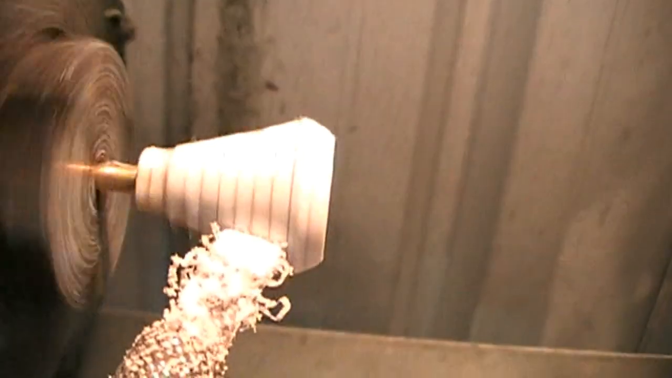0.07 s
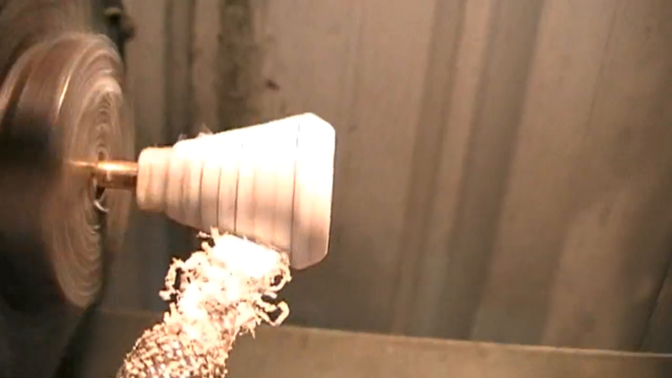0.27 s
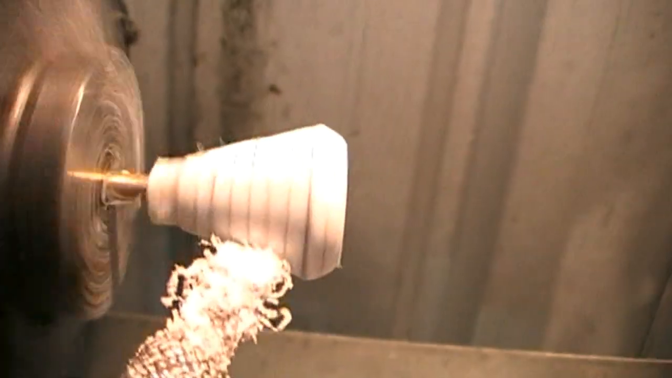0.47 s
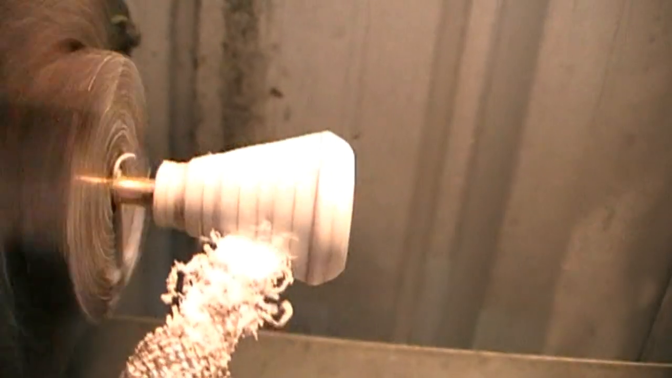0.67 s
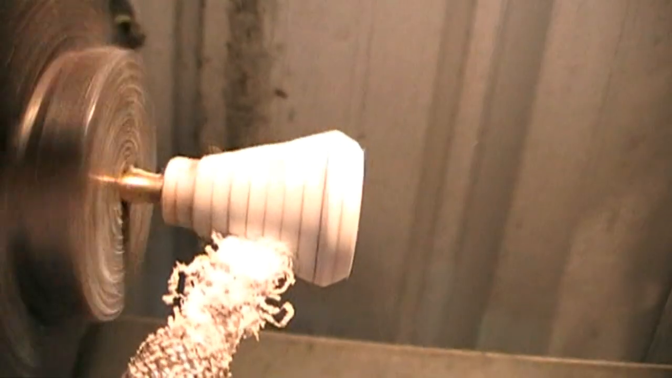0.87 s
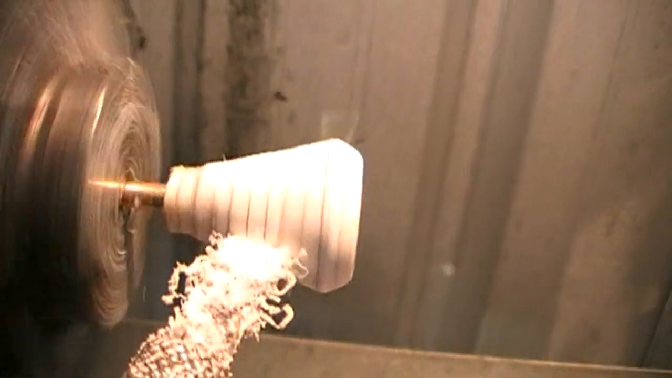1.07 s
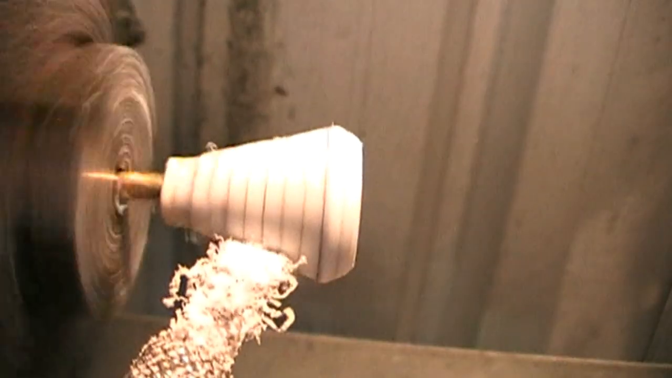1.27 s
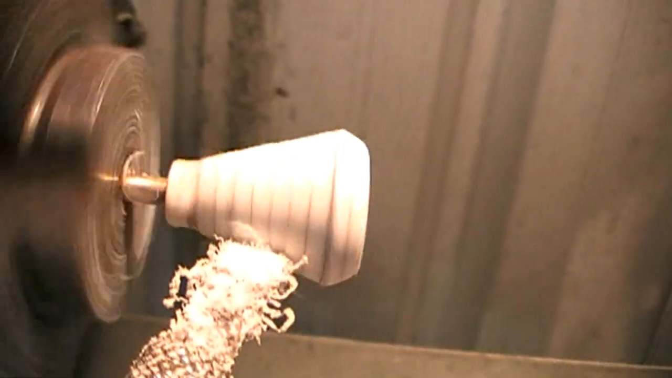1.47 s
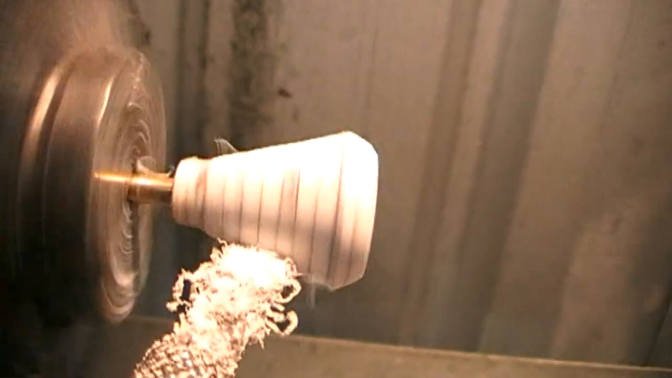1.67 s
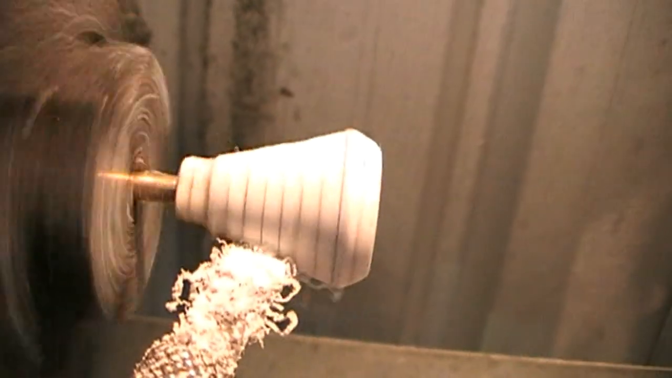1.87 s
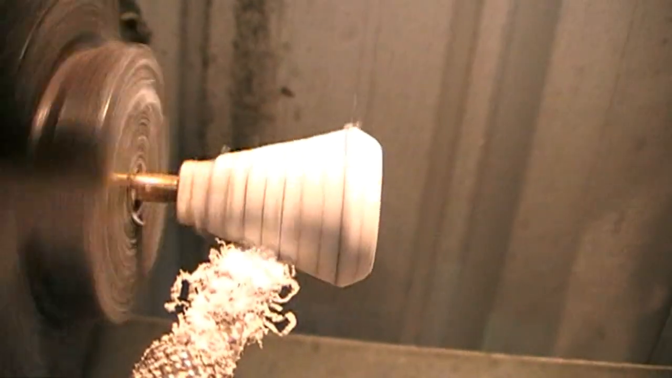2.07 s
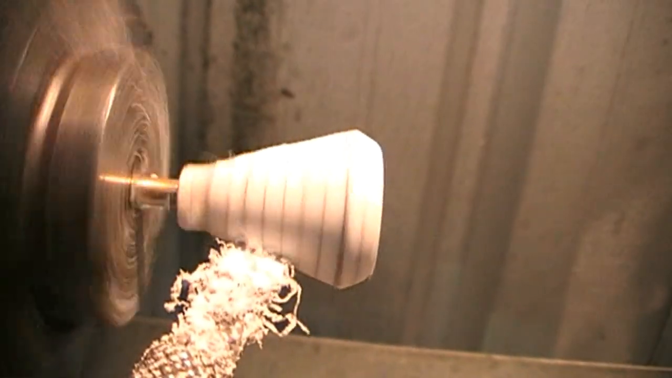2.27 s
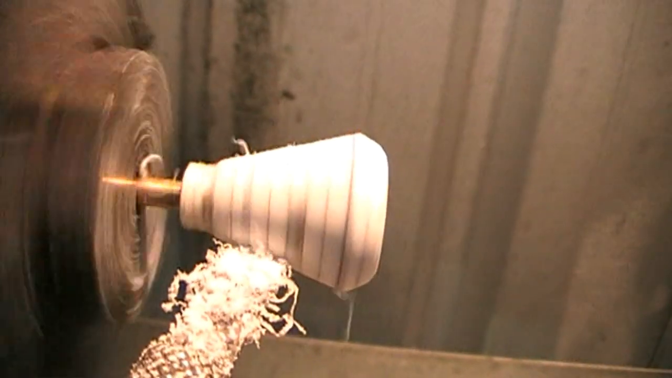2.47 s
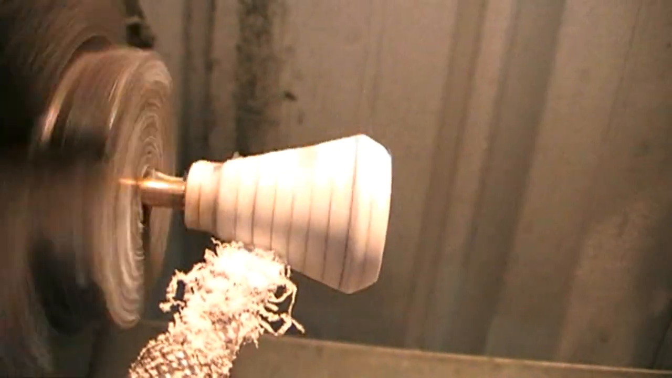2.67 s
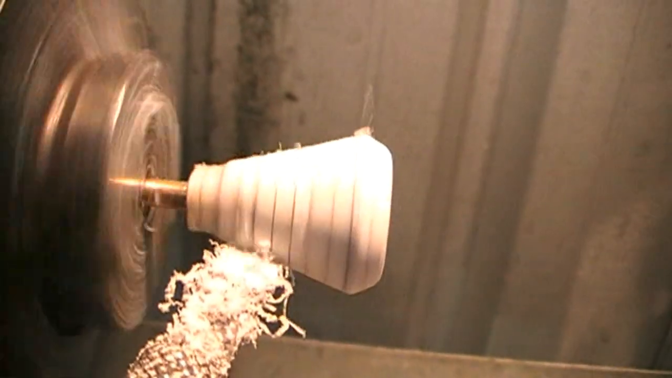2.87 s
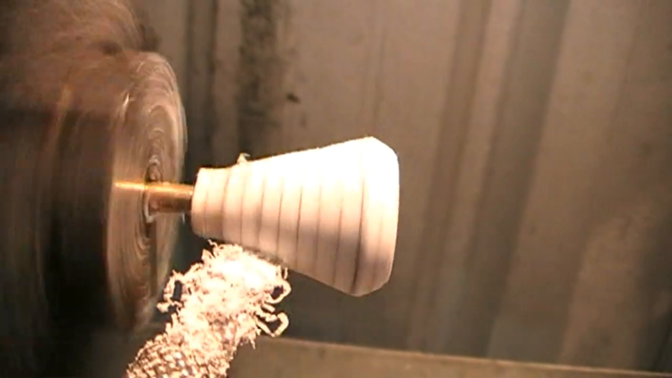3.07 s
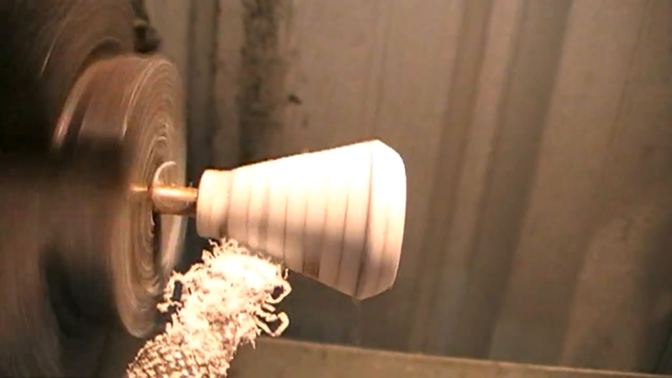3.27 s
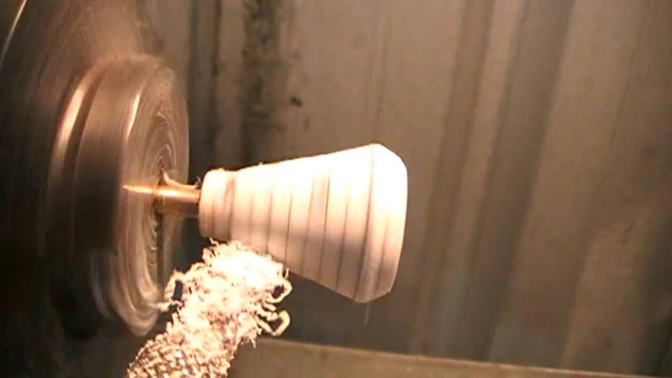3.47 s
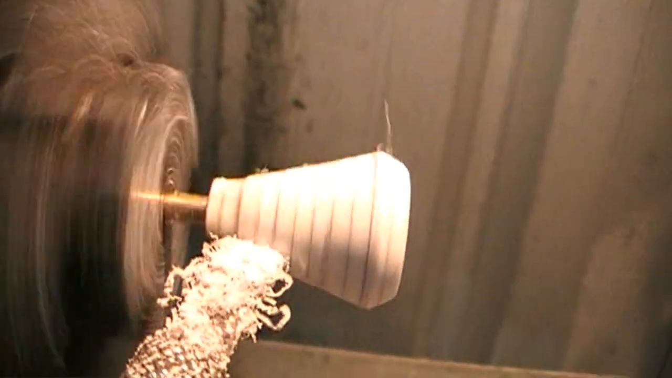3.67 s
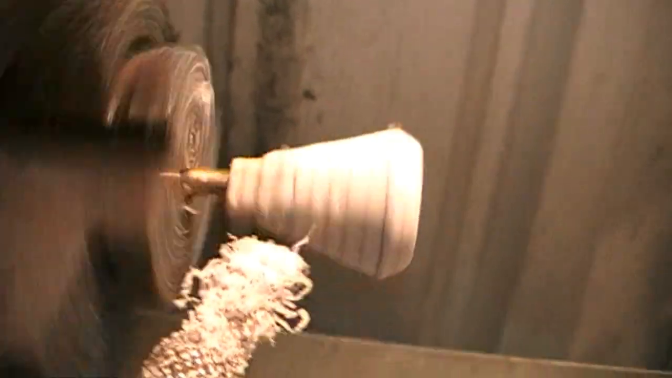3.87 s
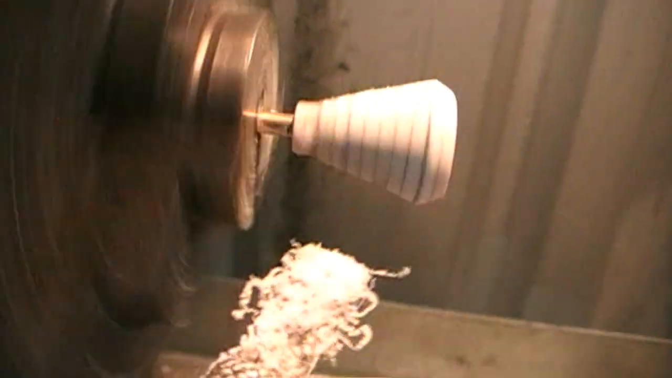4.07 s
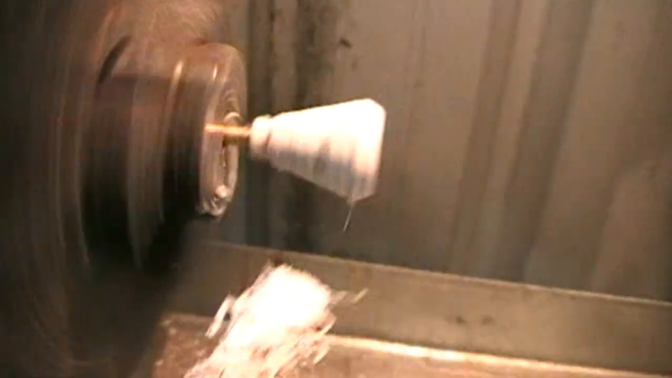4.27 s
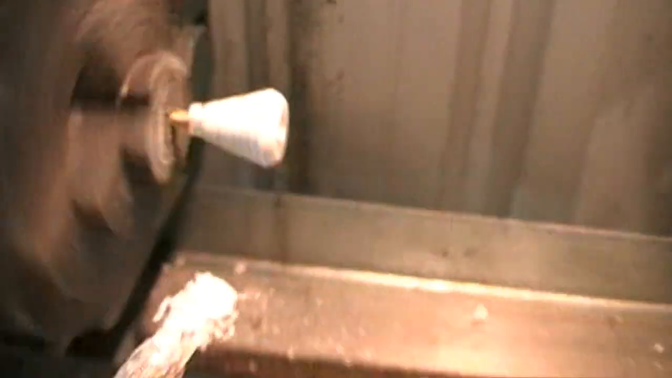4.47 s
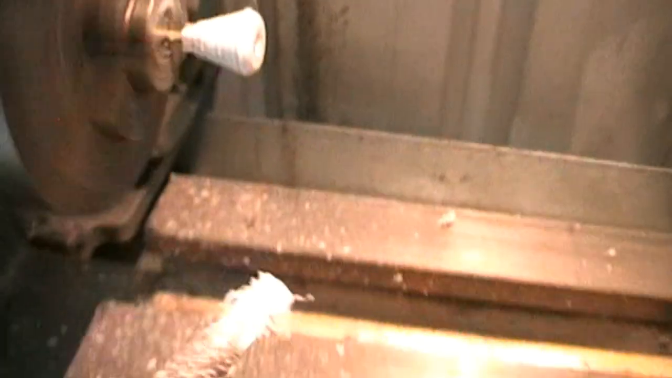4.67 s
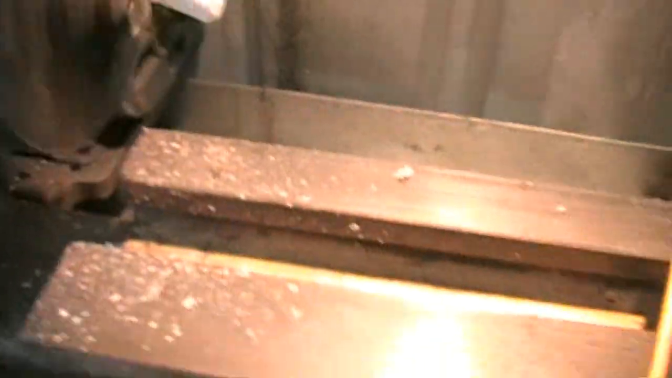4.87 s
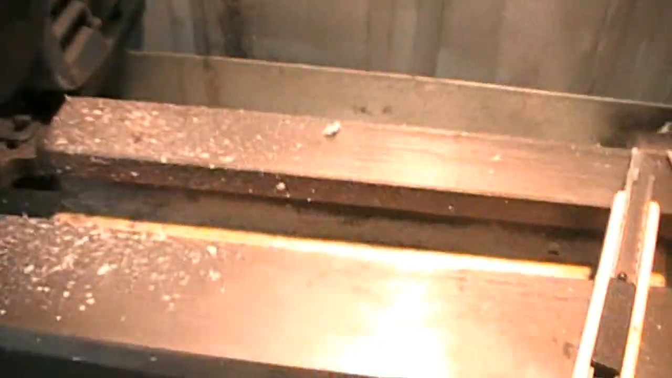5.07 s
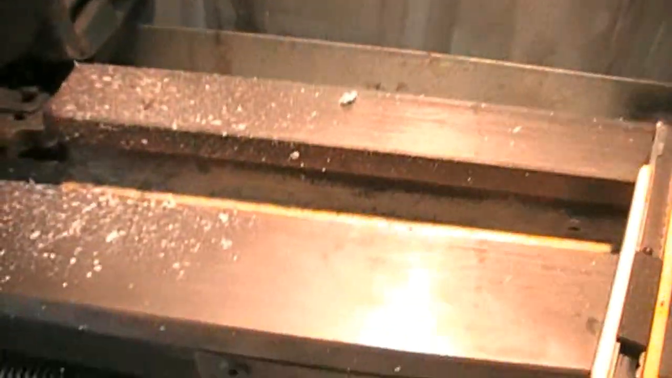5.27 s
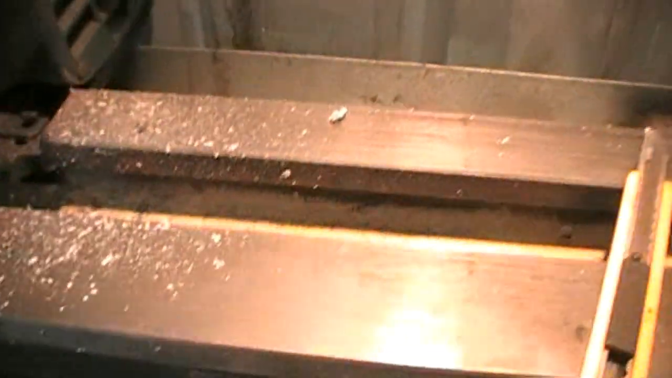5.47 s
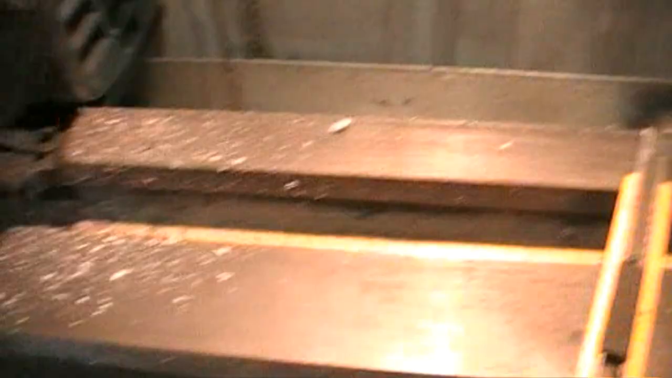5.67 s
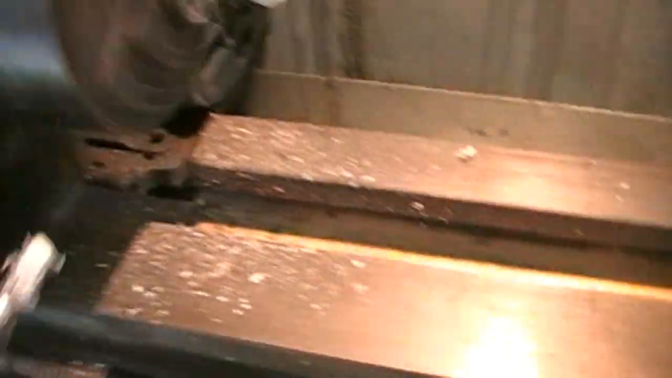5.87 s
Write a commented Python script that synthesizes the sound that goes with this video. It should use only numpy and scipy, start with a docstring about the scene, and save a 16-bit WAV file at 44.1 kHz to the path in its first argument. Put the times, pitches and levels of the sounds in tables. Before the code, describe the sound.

A blade scrapes work spinning on a lathe with a high, chattering squeal, then stops, leaving the throbbing motor and two sharp clicks.

```python
"""In a workshop, a hand-held blade shaves the work spinning on a small lathe.
Stick-slip friction makes the edge chatter and, in two bouts, squeal; tearing shavings set the blade
ringing and the loaded mandrel hums until the edge lets go. The motor throbs on, and slack in the drive
knocks once a spindle turn. Two close clicks sound; the first, brighter one makes an automatic gain
control briefly duck the level."""
import sys
import numpy as np
from scipy import signal
from scipy.fft import rfft, irfft
from scipy.io import wavfile
from scipy.ndimage import uniform_filter1d, minimum_filter1d

SR = 44100
rng = np.random.default_rng(int(sys.argv[2]) if len(sys.argv) > 2 else 0)


def inscribe(sig):
    """Save sig as 16-bit PCM at rate SR to the path in sys.argv[1].

    A 1-D sig is mono; a 2-D sig holds one channel per row.
    Samples are clipped to [-1, 1] before scaling.
    """
    pcm = np.round(np.clip(np.atleast_2d(sig).T, -1, 1) * 32767)
    wavfile.write(sys.argv[1], SR, pcm.astype(np.int16))


N = 260631
T = np.arange(N) / SR
SPINDLE_HZ = 8.82


# course of the cut: (time [s], chatter [dB], blade ring [dB], shavings [dB], chatter frequency [Hz],
# coupling to the uneven work [ratio], stutter depth [dB])
CUT_COURSE = [(0, -32.5, -39.5, -31, 2985, 0.4, 5), (.2, -20.5, -22, -21, 3052, 0.35, 2.5),
              (.4, -19, -25.5, -22.5, 3600, 0.89, 2.5), (.68, -23.5, -27.5, -25, 4100, 1.07, 3.5),
              (1, -29, -35, -29.5, 3002, 1, 3.5), (1.3, -27.5, -32, -33.5, 3732, 1.04, 2),
              (1.6, -22, -28, -27.5, 4255, 0.58, 3.5), (2, -17.5, -23.5, -29, 4838, 0.26, 1.4),
              (2.4, -18, -22.5, -46, 4820, .2, -1), (2.6, -15.5, -24.5, -59, 4840, .2, 2.9),
              (3.03, -17.5, -28, -53, 5150, 0.07, -0.4), (3.06, -20.5, -27, -33, 5200, 0.09, 4),
              (3.25, -15, -29, -32, 5215, .05, 4), (3.45, -21.5, -29.5, -30, 5135, 0.02, 4),
              (3.57, -23, -28.5, -26, 5014, .05, 3), (3.62, -20.5, -23, -26, 4560, 0.1, 4),
              (3.67, -29.5, -27, -28, 4276, .05, 7), (3.71, -33, -31, -24, 3500, 0.02, 5),
              (3.78, -65, -58, -56, 3000, .05, 10)]

def cut():
    """Amplitude modulation: one contact force drives chatter, shavings and blade ring together."""
    chatter_db, ring_db, shaving_db, hz, coupling, stutter_db = in_time(CUT_COURSE)
    contact_db, tilt = contact(coupling, stutter_db)
    # a dig that sets the blade ringing drags the chatter down in pitch
    sag = .012 * np.clip(tilt, 0, 20) * np.clip(1 - coupling, 0, 1)
    edge = from_db(chatter_db - .29 * tilt) * chatter(hz * (1 - sag), coupling)
    tears = grains(per_s=9000 * from_db((3 + .8 * stutter_db) * drift(110)), spread_db=3)
    torn = from_db(shaving_db) * shavings(tears)
    ringing = from_db(ring_db + .33 * tilt) * blade_ring(tears)
    return from_db(contact_db) * (edge + torn + ringing)


# the edge digs in: (time [s], gain [dB], tilt from chatter to blade ring [relative])
EDGE_DIGS = [(.03, 19.5, 3.5), (.134, 5.5, -5), (0.297, 3.5, 2), (.35, 1, 4), (0.408, 5.5, 12),
             (.625, 4, 5), (.733, 5, -2), (.81, 6.5, -5), (.854, 5, 14), (1.012, 2.5, -5), (1.041, 7, 22),
             (1.123, 10, 21), (1.18, 7.5, 3), (1.196, 10, 11), (1.292, 4.5, 4), (1.308, 7.5, 7),
             (1.422, 5.5, 6), (1.578, 0, 6), (1.69, 10, 14), (1.742, 5, 6), (1.922, 5.5, 9),
             (2.035, 3.5, 6), (3.036, 6.5, -23), (3.106, 2.5, -4.5), (3.15, 9.5, -1.5), (3.178, 5, -1),
             (3.219, 9.5, 4), (3.237, 2.5, 3), (3.262, 4, 6), (3.286, 6, 0), (3.346, 5.5, 9), (3.374, 4, 8),
             (3.398, 4, 4), (3.42, 3.5, -16.5), (3.456, 6, 4), (3.484, 10.5, 27), (3.555, 2, -12),
             (3.642, 5.5, -11), (3.657, 4, -10), (3.689, 11, -3), (3.722, 5.5, -8)]
# the edge bounces off the work: (time [s], width [s], gain [dB])
EDGE_BOUNCES = [(0.111, .0082, -24), (.225, .0051, -19), (0.444, 0.0049, -10), (.492, .006, -7),
                (.668, .006, -8), (.716, 0.0042, -25), (.776, .005, -4), (.905, 0.019, -2),
                (1.052, 0.0037, -13), (1.168, 0.0029, -9), (1.345, 0.018, -4.5), (1.793, 0.0028, -18),
                (3.08, 0.0037, -8), (3.131, .0033, -6), (3.198, 0.015, -11.5), (3.322, 0.014, -6),
                (3.595, 0.0037, -13)]
# high and low spots at unit coupling: (position [turns], width [s], gain [dB], tilt [relative])
WORK_SPOTS = [(.32, 0.0032, -2.5, 3), (.54, 0.0064, 4.5, 8), (.84, 0.0053, -7.5, -16), (.96, 0.01, 0.5, -2)]

def contact(coupling, stutter_db):
    """Intermittent contact: digs, bounces and spots vary the level and tilt it toward ring or chatter."""
    dig_s, dig_db, dig_tilt = np.transpose(EDGE_DIGS)
    width_s = .0035 + .0054 * np.interp(dig_s, T, coupling)
    stutter = stutter_db * np.minimum(.91 * drift(61) + .51 * drift(144), .9)
    contact_db = bumps(dig_s, width_s, dig_db) + bumps(*np.transpose(EDGE_BOUNCES)) + stutter
    tilt = bumps(dig_s, width_s, dig_tilt)
    turns = np.arange(CUT_COURSE[-1][0] * SPINDLE_HZ)
    for position, spot_width_s, gain_db, spot_tilt in WORK_SPOTS:
        spot = coupling * bumps((turns + position) / SPINDLE_HZ, spot_width_s, 1)
        contact_db += gain_db * spot
        tilt += spot_tilt * spot
    return contact_db, tilt


# the work runs out of round: (lobes [per turn], weight [ratio], phase [rad])
RUNOUT = [(1, 1.0, 2.2), (2, .7, -1.5), (3, .9, 2.9), (4, .7, 2.3)]

def chatter(hz, coupling):
    """Self-excited vibration: two parts of the edge stick and slip out of tune, modulated by runout."""
    lobes = sum(weight * np.cos(2 * np.pi * k * SPINDLE_HZ * T + phase) for k, weight, phase in RUNOUT)
    roughness = .048 * (4999 / hz) ** 2.1  # grows as the pitch falls
    wobble = (.017 + .048 * coupling) * (1.1 * lobes + .7 * drift(30))
    hz = hz * (1 + wobble)
    out = np.zeros(N)
    for detune in (.975, 1.025):
        tone = stick_slip(hz * detune, [(1, 2), (2, -6), (3, -9.5)], jitter=roughness, jitter_hz=1000)
        out += tone * from_db(4 * np.minimum(drift(296), 1.2))
    return rms_one(out)


# spectrum of tearing shavings: (frequency [Hz], relative level [dB])
SHAVING_SPECTRUM = [(400, -33), (800, 7.5), (1500, 4.5), (2700, -6), (4000, 12.5), (6000, 0), (10000, 2),
                    (12000, 9), (16000, 4.5)]

def shavings(tears):
    """Shot noise: many tiny fractures merge into a broadband rasp."""
    return rms_one(shaped(tears, SHAVING_SPECTRUM))


# blade resonances: (frequency [Hz], nominal bandwidth [Hz], relative level [dB])
BLADE_MODES = [(7400, 510, 19), (8030, 260, 11.5), (9350, 1500, -17)]

def blade_ring(tears):
    """Forced resonance: the tears excite the blade's modes, and a wider mode decays sooner."""
    return rms_one(sum(from_db(db) * ring(tears, hz, t60=2.73 / width) for hz, width, db in BLADE_MODES))


# friction locks: (time [s], duration [s], first frequency [Hz], settled frequency [Hz], level [dB])
SQUEAL_LOCKS = [(0.021, .016, 1220, 1440, -22), (.126, 0.018, 1475, 1410, -15),
                (0.148, 0.054, 1466, 1660, -15), (0.205, 0.019, 1000, 1602, -14),
                (0.225, 0.039, 1549, 1730, -18), (1.033, .016, 1610, 1598, -20),
                (1.056, 0.01904, 1625, 1680, -16), (1.073, 0.03, 1497, 1499, -15.5),
                (1.116, .019, 1460, 1515, -16.5)]
# the squeal's tone: (harmonic [number], level [dB])
SQUEAL_HARMONICS = [(1, 3.5), (2, -10), (3, -20), (4, -8.5), (5, -12), (6, -14), (7, -19)]
# rough friction around it: (harmonic [number], level [dB])
RASP_HARMONICS = [(1, -5.5), (2, -12.5), (5, -16)]
SETTLE_S, SAG_S, SAG_SHARE, RAMP_S = .0047, .006, .06, .0016

def squeals():
    """Stick-slip locking: the pitch settles, holds, then sags as the lock breaks."""
    hz, level = np.full(N, 1500.), np.zeros(N)
    for s, length, first_hz, settled_hz, db in SQUEAL_LOCKS:
        since, until = T - s, s + length - T
        settling_hz = settled_hz + (first_hz - settled_hz) * np.exp(-np.abs(since) / SETTLE_S)
        sag = SAG_SHARE * np.exp(-np.abs(until) / SAG_S)
        gate = np.clip(np.minimum(since, until) / RAMP_S, 0, 1)
        hz = np.where(gate > 0, settling_hz * (1 - sag), hz)
        level += gate * from_db(db)
    rasp = stick_slip(hz, RASP_HARMONICS, jitter=.13, jitter_hz=900)
    flutter = from_db(1.5 * np.minimum(drift(120), .7))
    tone = stick_slip(hz, SQUEAL_HARMONICS, jitter=.013, jitter_hz=200)
    return level * flutter * (tone + rasp)


# hum of the work on its mandrel: (time [s], frequency [Hz], level [dB])
MANDREL_COURSE = [(.26, 1018, -40), (.3, 1000, -26.5), (.66, 980, -30.5), (.9, 974, -34),
                  (1.45, 950.6, -33), (1.9, 906.5, -35), (3, 867.6, -38.5), (3.5, 866, -34),
                  (3.68, 900, -27.5), (3.78, 906.6, -47)]

def mandrel():
    """Vibration under load: a narrow, wavering hum lasts while the blade presses."""
    hz, db = in_time(MANDREL_COURSE)
    pressing = np.clip((MANDREL_COURSE[-1][0] - T) / .052, 0, 1)
    return pressing * from_db(db + 3 * drift(50)) * stick_slip(hz, [(1, 0)], jitter=.05, jitter_hz=120)


# close clicks: (time [s], crack level [dB], thud level [dB], treble gain [dB])
CLICK_EVENTS = [(5.2239, -2.5, -42, -4), (5.3652, -4.5, -17.5, -16)]
# spectrum of the crack: (frequency [Hz], relative level [dB])
CRACK_SPECTRUM = [(180, -67), (300, -31), (1080, -11), (1610, -13), (3030, -16), (3640, -9), (5160, -5),
                  (7080, 4.5), (10900, -3), (16000, -56)]
# resonances of the thud: (frequency [Hz], level [dB], 60 dB decay time [s])
THUD_MODES = [(347, -14, 0.092), (630, 2, 0.035)]

def clicks():
    """Impulsive transients: a bright crack of decaying noise, then a hollow thud of damped modes."""
    noise = rms_one(shaped(rng.standard_normal(N), CRACK_SPECTRUM))
    out = np.zeros(N)
    for s, crack_db, thud_db, treble_db in CLICK_EVENTS:
        since = np.abs(T - s)
        fade = (T >= s) * (np.exp(-since / .0012) + .41 * np.exp(-since / .011))
        out += from_db(crack_db) * fade * shaped(noise, [(5000, 0), (9000, treble_db)])
        blow = from_db(thud_db) * (np.arange(N) == round((s + .003) * SR))
        out += sum(from_db(db) * ring(blow, hz, t60) for hz, db, t60 in THUD_MODES)
    return out


# the running lathe: (time [s], rumble level [dB], hiss level [dB])
LATHE_LEVELS = [(0, -35.5, -39), (.6, -32, -31.5), (1.2, -35.5, -46), (2, -36.5, -32.5), (3.6, -33, -35.5),
                (4.2, -33, -33.5), (4.8, -34.5, -34.5), (5.91, -33.5, -34.5)]
MOTOR_HZ, MOTOR_TICK_S = 24.65, 4.335  # rotation rate; the time of one tick sets the phase

def lathe():
    """Rotating machinery noise: rumble, hiss, hum and ticks follow the motor, knocks the spindle."""
    rumble_db, hiss_db = in_time(LATHE_LEVELS)
    angle = 2 * np.pi * MOTOR_HZ * (T - MOTOR_TICK_S)
    rumble = from_db(rumble_db) * motor_rumble(angle)
    hiss = from_db(hiss_db) * motor_hiss(angle)
    hum = from_db(rumble_db - rumble_db.mean()) * motor_hum(angle)
    ticks = from_db(rumble_db) * motor_ticks()
    return rumble + hiss + hum + ticks + drive_knocks()


# headstock resonances: (frequency [Hz], level [dB], 60 dB decay time [s])
HEADSTOCK_MODES = [(1063, -3, 0.08), (1190, -1, 0.032), (1468, -7, 0.082), (1865, 3, 0.021),
                   (2290, 3, 0.049), (2350, -6, 0.048), (2685, -5.5, 0.062), (3590, -11.5, 0.09)]
# knocks that land harder or softer: (time [s], gain [dB])
KNOCK_ACCENTS = [(1.63, 5.5), (1.97, 5.5), (2.08, -1.5), (2.54, -11), (2.65, 2.5), (2.76, 4), (2.88, -12),
                 (3.44, 2.5), (3.56, -11), (3.67, 3), (3.78, 3), (4.01, 7.5), (4.12, 5.5), (4.35, 1),
                 (4.46, 2), (4.69, -9), (4.8, 3), (4.91, -4), (5.03, -15), (5.37, -13), (5.48, -6),
                 (5.82, -4)]
# stray taps on the frame: (time [s], level [dB])
FRAME_TAPS = [(1.6996, -27), (3.2, -29), (3.4801, -25), (3.5901, -29), (3.6959, -29), (3.971, -35)]
KNOCK_HZ, KNOCK_S, KNOCK_DB = 8.832, 1.9705, -28  # rate, time of one knock, base level

def drive_knocks():
    """Backlash: slack in the drive rings the headstock once a spindle turn, as do a few stray taps."""
    knock_s = np.arange(KNOCK_S % (1 / KNOCK_HZ), N / SR, 1 / KNOCK_HZ)
    knock_db = KNOCK_DB + sum(db * (np.abs(knock_s - s) < .5 / KNOCK_HZ) for s, db in KNOCK_ACCENTS)
    tap_s, tap_db = np.transpose(FRAME_TAPS)
    return struck(np.r_[knock_s, tap_s], np.r_[knock_db, tap_db], HEADSTOCK_MODES, contact_s=.0012)


# spectrum of the rumble: (frequency [Hz], relative level [dB])
RUMBLE_SPECTRUM = [(24, -80), (40, -50), (64, -49), (86, -15), (241, -12), (291, -3), (325, -9), (371, -7),
                   (798, -8), (1480, -9.5), (2150, -12), (2360, -11.5), (3500, -28), (4550, -54),
                   (7700, -120)]

def motor_rumble(angle):
    """Amplitude-modulated noise: the rumble swells once a motor turn."""
    noise = rms_one(shaped(rng.standard_normal(N), RUMBLE_SPECTRUM))
    return noise * from_db(2.9 * np.cos(angle - 1.2) + 1.1 * drift(4.5))


# spectrum of the hiss: (frequency [Hz], relative level [dB])
HISS_SPECTRUM = [(1650, -38), (2800, -6.5), (3240, -3), (4150, 1.5), (5440, -4), (6970, 1.5), (7770, -1),
                 (8420, 1.5), (8860, -0.5), (10300, -6.5), (13000, -22), (14900, -27), (16000, -36)]

def motor_hiss(angle):
    """Modulated shot noise: a hiss with one bright resonance throbs each turn, most in the treble."""
    throb = np.cos(angle - 2.2) + .28 * np.cos(2 * angle - 4.2) + .2 * np.cos(4 * angle - 2.5)
    hiss = rms_one(shaped(grains(per_s=15000, spread_db=2.5), HISS_SPECTRUM))
    hiss += from_db(-19) * rms_one(ring(hiss, hz=8560, t60=.014))
    treble = shaped(hiss, [(7000, -24), (11000, -.5)])
    hiss += treble * (from_db(3.9 * throb) - 1)
    return hiss * from_db(2.85 * throb + 1.32 * drift(8.3))


# resonances of a loose part on the motor: (frequency [Hz], level [dB], 60 dB decay time [s])
LOOSE_PART_MODES = [(1436, -9, 0.045), (2330, -2.5, 0.032), (2470, -2, 0.024), (8260, -33, 0.018)]

def motor_ticks():
    """Periodic impact: a loose part is struck once a motor turn."""
    times = np.arange(MOTOR_TICK_S % (1 / MOTOR_HZ), N / SR, 1 / MOTOR_HZ)
    return struck(times, 6.5, LOOSE_PART_MODES, contact_s=.0017)


# tones of the motor: (harmonic [number], rms level [dB])
MOTOR_HARMONICS = [(4, -62), (9, -53.5), (11, -52), (12, -43.5), (15, -49.5), (21, -52.5)]

def motor_hum(angle):
    """Rotational harmonics: tones at multiples of the motor's rate, each wavering in level."""
    return np.sqrt(2) * sum(from_db(db + 1.2 * drift(3.9)) * np.sin(k * angle + k)
                            for k, db in MOTOR_HARMONICS)


def stick_slip(hz, harmonics, jitter, jitter_hz):
    """Relaxation oscillation: sticking and slipping puts all harmonics on one unsteady phase."""
    phase = 2 * np.pi * np.cumsum(hz * (1 + jitter * drift(jitter_hz))) / SR
    return np.sqrt(2) * sum(from_db(db) * np.sin(k * phase) for k, db in harmonics)


def struck(times, levels_db, modes, contact_s, spread_db=2.5):
    """Modal superposition: each blow, a click and a short rattle, excites every mode unequally."""
    at, out = (times * SR).astype(int), np.zeros(N)
    scatter_db = rng.normal(0, spread_db, (len(at), len(modes)))
    noise, decay = rng.standard_normal(N), np.exp(-1 / (contact_s * SR))
    for k, (hz, db, t60) in enumerate(modes):
        blows = np.zeros(N)
        blows[at] = from_db(levels_db + db + scatter_db[:, k])
        rattle = noise * signal.lfilter([np.sqrt(1 - decay ** 2)], [1, -decay], blows + 1e-18)
        out += ring(.85 * (-1) ** k * blows + .5 * rattle, hz, t60)
    return out


def ring(x, hz, t60):
    """Damped oscillator: a unit impulse starts a decaying sine of height 1."""
    r, w = from_db(-60 / (t60 * SR)), 2 * np.pi * hz / SR
    return signal.lfilter([0, np.sin(w)], [1, -2 * r * np.cos(w), r * r], x + 1e-18)


def grains(per_s, spread_db):
    """Poisson process: random clicks of uneven size."""
    sizes = from_db(spread_db * np.minimum(rng.exponential(1, N), 5)) * rng.choice([-1, 1], N)
    return sizes * (rng.random(N) < per_s / SR)


def drift(hz):
    """Random fluctuation: low-passed noise of unit rms."""
    r = np.exp(-2 * np.pi * hz / SR)
    return rms_one(signal.lfilter([1], [1, -2 * r, r * r], rng.standard_normal(N + SR))[SR:])


def bumps(times, widths, heights):
    """Superposition of Gaussian pulses."""
    out = np.zeros(N)
    for s, width, height in np.broadcast(times, widths, heights):
        near = slice(max(int((s - 4 * width) * SR), 0), int((s + 4 * width) * SR))
        out[near] += height * np.exp(-.5 * ((T[near] - s) / width) ** 2)
    return out


def shaped(x, points, phase=0):
    """Spectral filtering through (frequency [Hz], gain [dB]) points, flat beyond the ends."""
    hz = np.maximum(np.fft.rfftfreq(N, 1 / SR), 1)
    at, db = np.transpose(points)
    gain = from_db(np.interp(np.log(hz), np.log(at), db))
    return irfft(rfft(x) * gain * np.exp(1j * phase), N)


def in_time(rows):
    """Linear interpolation of each column over the times in the first."""
    s, *columns = np.transpose(rows)
    return [np.interp(T, s, column) for column in columns]


def from_db(db):
    return 10 ** (np.asarray(db) / 20)


def rms_one(x):
    return x / np.sqrt(np.mean(x ** 2) + 1e-20)


# diffuse share that differs left and right: (frequency [Hz], level [dB])
DIFFUSE_SHARE = [(60, -9.5), (300, -14.5), (1400, -8.5), (4000, -10), (8000, -10), (15000, -4)]

def stereo(x, differences):
    """Decorrelation: the two sides differ in level, in phase and in the sign of a scattered copy."""
    at, db, lead = np.transpose(differences)
    hz = np.fft.rfftfreq(N, 1 / SR)
    scatter = rng.standard_normal(5000) * np.exp(-np.arange(5000) / SR / .015)
    scatter /= np.linalg.norm(scatter)
    side = shaped(signal.fftconvolve(x, scatter)[:N], DIFFUSE_SHARE)
    left = shaped(x + side, np.c_[at, db / 2])
    right = shaped(x - side, np.c_[at, -db / 2], np.interp(hz, at, lead))
    return np.array([left, right])


# the blade as heard from the side: (frequency [Hz], gain [dB])
BLADE_OFF_AXIS = [(1000, 0), (2600, 0), (4000, -5.5), (5300, -1.5), (6400, -1.5), (7200, 0), (10200, 2.5),
                  (11500, -1.5), (13000, -11.5), (16000, -11.5)]
# paths from the blade: (frequency [Hz], left over right [dB], phase lead of the right [rad])
BLADE_PATHS = [(100, 1.5, 0), (1500, 1.8, 0), (3000, 1.5, 0), (4800, 3.2, -.3), (6300, 4, .7),
               (8700, 4, 1.0), (10200, 5, 2.0), (11700, 8, 2.8), (16000, 8, 3.5)]
# paths from lathe and clicks: (frequency [Hz], left over right [dB], phase lead of the right [rad])
LATHE_PATHS = [(100, 0.54, 0.058), (2400, 1.9, 0.15), (4400, 0.31, 0.4), (9000, 0, 1), (12000, 0.13, 1.5),
               (16000, 1.7, 9.2)]

def scene():
    """Superposition: all sources add, and the mandrel's hum reaches the two sides in antiphase."""
    blade = stereo(shaped(cut() + squeals(), BLADE_OFF_AXIS), BLADE_PATHS)
    workshop = stereo(lathe() + clicks(), LATHE_PATHS)
    return blade + workshop + mandrel() * np.array([[2.2], [-.9]])


BASS_CUT_HZ, TOP_CUT_HZ = 95, 16400
THRESHOLD_DB, HOLD_S, SMOOTHING_S = -8.5, .065, .016

def record(dry):
    """Automatic gain control: loud peaks duck the band-limited sound, which then saturates softly."""
    x = signal.sosfilt(signal.butter(8, BASS_CUT_HZ, "high", fs=SR, output="sos"), dry)
    power = uniform_filter1d((x ** 2).mean(axis=0), size=66, origin=32)
    over_db = np.maximum(10 * np.log10(np.abs(power) + 1e-12) - THRESHOLD_DB, 0)
    hold = round(HOLD_S * SR)
    over_db = -minimum_filter1d(-over_db, hold, origin=(hold - 1) // 2)  # hold the recent peak
    release_db = 60 * T
    held_db = np.maximum.accumulate(over_db + release_db) - release_db
    r = np.exp(-1 / (SMOOTHING_S * SR))
    gain_db = -2.2 * signal.lfilter([1 - r], [1, -r], held_db)
    saturated = 1.126 * np.tanh(x * from_db(gain_db) / 1.24)
    return signal.sosfilt(signal.cheby2(14, 70, TOP_CUT_HZ, fs=SR, output="sos"), saturated)


dry = scene()
out = record(dry)
inscribe(out)
```